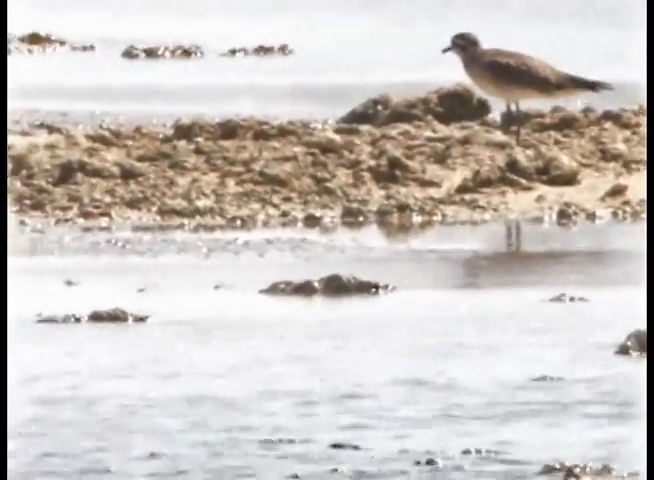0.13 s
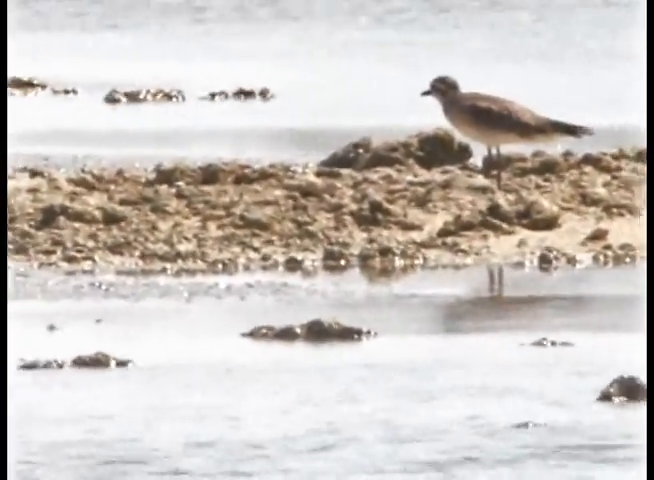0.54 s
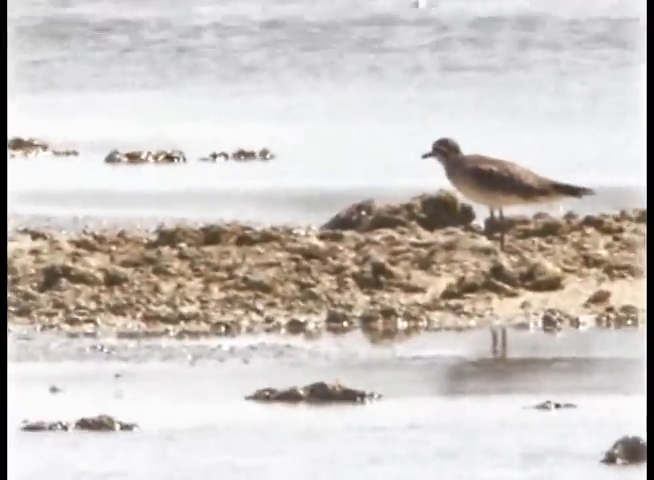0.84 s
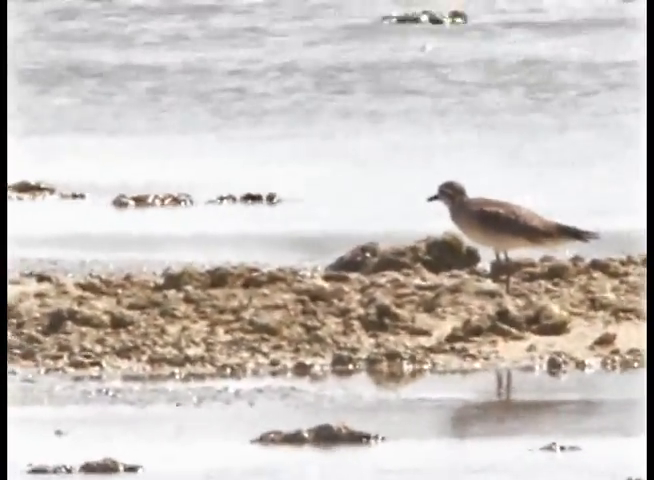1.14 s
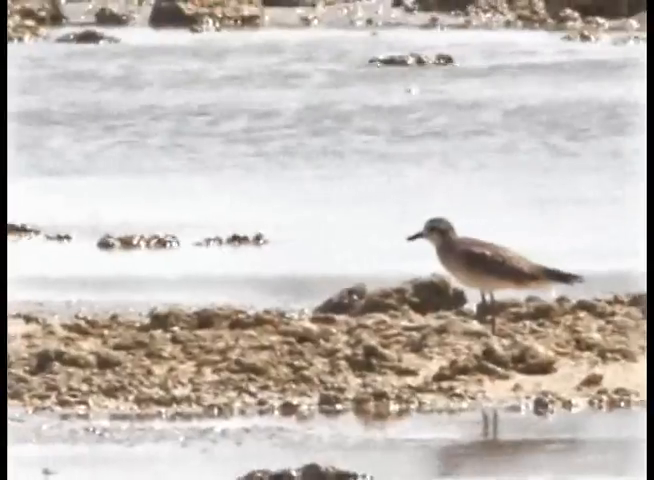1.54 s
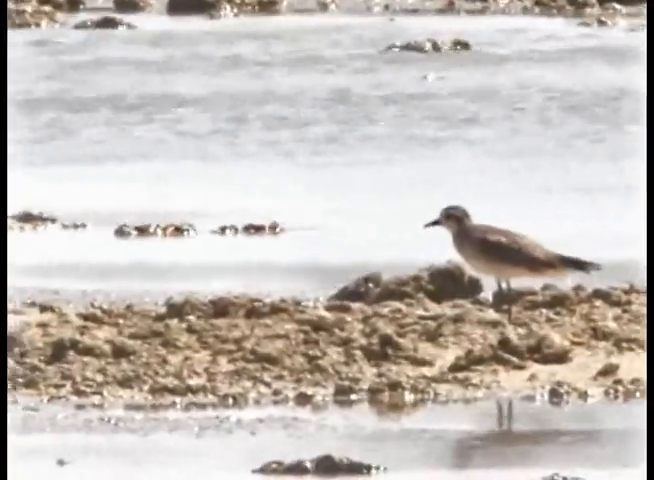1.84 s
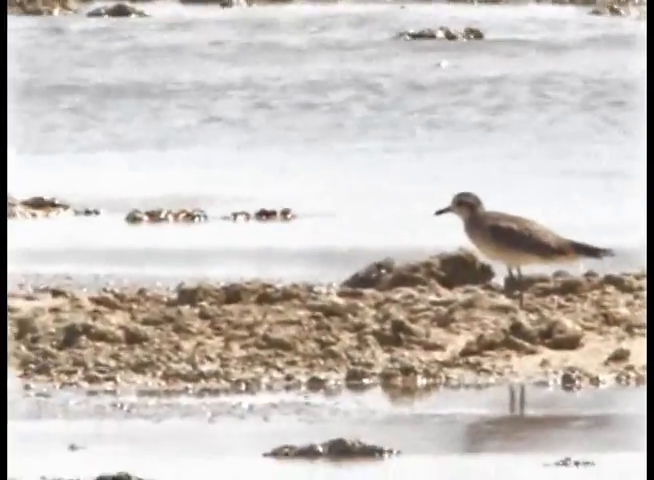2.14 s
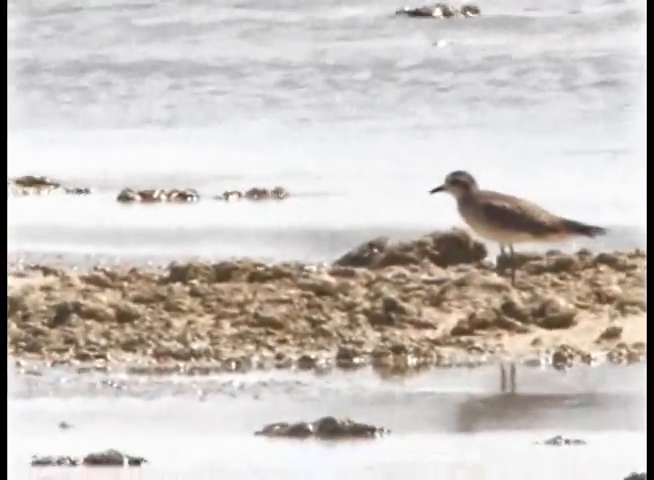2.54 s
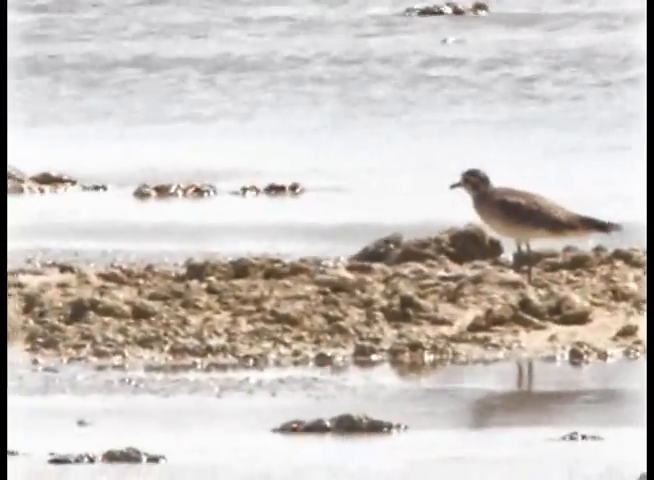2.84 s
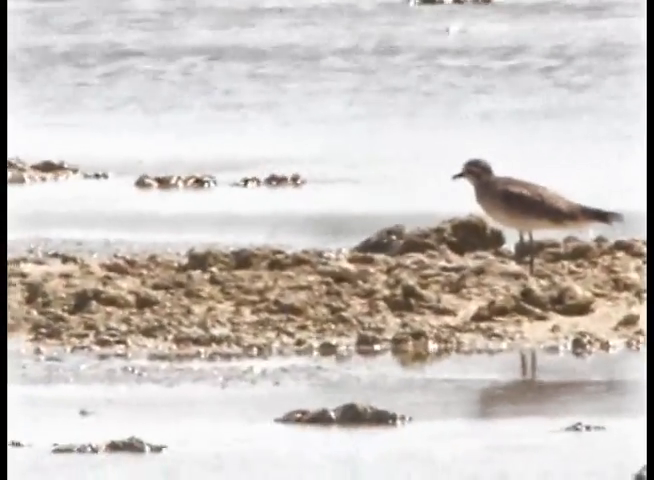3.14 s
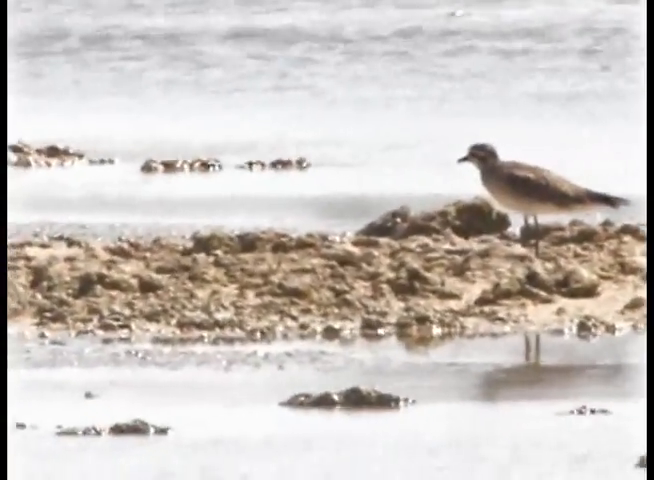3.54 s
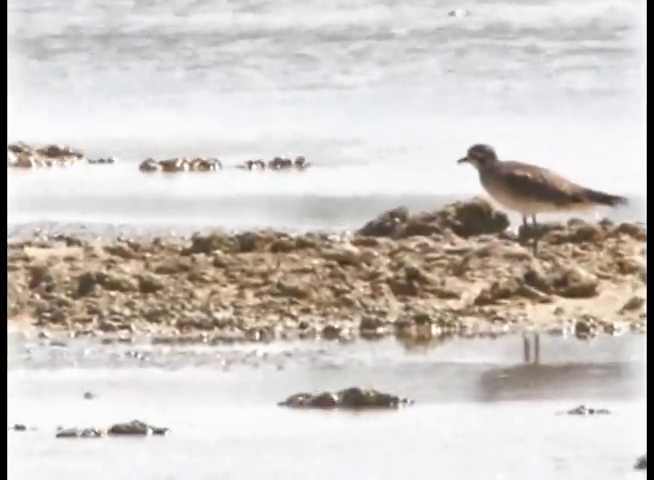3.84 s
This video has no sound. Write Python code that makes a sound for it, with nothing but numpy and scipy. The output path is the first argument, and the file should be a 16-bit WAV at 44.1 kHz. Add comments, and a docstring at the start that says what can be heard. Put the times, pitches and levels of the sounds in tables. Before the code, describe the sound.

Wind buffets the microphone in short, low thumps that grow louder and denser toward the end. Behind it, a distant bird repeats a brief raspy call over the steady hiss of an open tidal flat, with faint camera ticking.

```python
"""An open tidal flat, heard from a small camera. Short gusts buffet its microphone: each eddy is a low
thump, and the hardest clusters overload it. A far bird repeats an arched, throbbing call, with one
falling whistle and faint chirps around it. The camera adds its own whirr and ticking, and under
everything lies a steady noise wash of air and water."""
import sys
import numpy as np
from scipy import signal
from scipy.fft import rfft, irfft
from scipy.io import wavfile
from scipy.ndimage import uniform_filter1d

SR = 44100
rng = np.random.default_rng(int(sys.argv[2]) if len(sys.argv) > 2 else 0)


def persist_wave(psi):
    """Save psi, clipped to +-1, as 16-bit WAV."""
    counts = np.round(np.clip(psi, -1, 1) * 32767).astype(np.int16)
    wavfile.write(sys.argv[1], SR, np.atleast_2d(counts).T)


N = 176400


def amp(db):
    """Decibels to gain."""
    return 10 ** (np.asarray(db) / 20)


def rms_one(x):
    """Scale to unit rms."""
    return x / np.sqrt(np.mean(x ** 2) + 1e-20)


def drift(rate_hz, size=N):
    """Random modulator gliding between values of unit spread."""
    knots = rng.standard_normal(int(N / SR * rate_hz) + 2)
    return np.interp(np.arange(size) / SR * rate_hz, np.arange(len(knots)), knots)


def tone(hz):
    """Sine of unit rms along a pitch curve."""
    return np.sqrt(2) * np.sin(2 * np.pi * np.cumsum(hz) / SR)


def resonate(x, hz, width_hz):
    """Two-pole resonator with unity gain at its peak."""
    r = np.exp(-np.pi * width_hz / SR)
    gain = (1 - r * r) / 2
    return signal.lfilter([gain, 0, -gain], [1, -2 * r * np.cos(2 * np.pi * hz / SR), r * r], x)


def narrow_noise(bands):
    """Narrow bands of noise, each sent twice through its resonator."""
    return sum(amp(db) * rms_one(resonate(resonate(rng.standard_normal(N), hz, width), hz, width))
               for hz, width, db in bands)


def bursts(events, t60_s):
    """Noise bursts with a fast attack and a dying tail."""
    kicks, r = np.full(N, 1e-18), amp(-60 / (t60_s * SR))
    for s, db in events:
        kicks[int(s * SR)] = amp(db)
    envelope = signal.lfilter([np.e * (1 - r)], [1, -2 * r, r * r], kicks)
    return envelope * rng.choice([-1, 1], N)


def add(out, s, sound):
    """Mix a sound in at s seconds."""
    i = int(s * SR)
    out[i:i + len(sound)] += sound[:N - i]


def wind_buffets():
    """Each eddy striking the microphone makes a short thump of low noise."""
    # eddies: (time [s], length [s], level [dB], centre [Hz])
    eddies = [(0.667, 0.029, -47, 122), (1.474, 0.014, -31.5, 170.0), (1.485, 0.01, -19.5, 187),
              (1.498, 0.0073, -14.5, 255), (1.509, 0.0081, -19, 278), (1.523, 0.018, -34, 242),
              (1.568, 0.0068, -24, 219), (1.71, 0.031, -43, 159), (1.848, 0.02, -37.5, 147),
              (1.876, 0.052, -39, 154), (1.93, 0.017, -37, 167), (1.982, 0.028, -33.5, 140.0),
              (2.006, 0.016, -18.5, 179), (2.029, 0.021, -33, 201), (2.049, 0.071, -40, 129),
              (2.677, 0.0066, -15, 195), (2.703, 0.022, -22.5, 160), (2.747, 0.036, -39, 145),
              (2.819, 0.0095, -36, 173), (2.984, 0.018, -33.0, 124), (3.006, 0.018, -25.5, 250),
              (3.034, 0.011, -13, 270), (3.054, 0.017, -23, 190), (3.126, 0.021, -21, 183),
              (3.149, 0.012, -5.5, 286), (3.172, 0.023, -9, 328), (3.207, 0.079, -36, 210.0),
              (3.236, 0.0069, -14.5, 250), (3.258, 0.019, -18, 236), (3.279, 0.0082, -7.5, 332),
              (3.298, 0.012, -15, 251), (3.372, 0.031, -29.5, 228), (3.441, 0.023, -25.5, 168),
              (3.465, 0.0098, -21, 200.0), (3.479, 0.022, -18.5, 233), (3.518, 0.029, -17, 273),
              (3.54, 0.02, -21.5, 265), (3.571, 0.066, -27.5, 200), (3.626, 0.067, -28.5, 137),
              (3.639, 0.0071, -22.0, 208), (3.669, 0.026, -24.5, 153), (3.688, 0.022, -28, 260),
              (3.716, 0.079, -33.5, 157), (3.907, 0.023, -36, 162)]
    out, size = np.zeros(N), 8192
    f = np.arange(size // 2 + 1) * SR / size
    t = (np.arange(size) - size // 2) / SR
    for s, length, db, hz in eddies:
        ratio = f / (1.05 * hz)
        band = ratio ** 1.45 / np.sqrt(1 + ratio ** 8.888)   # rises 9, then falls 18 dB per octave
        envelope = .5 ** (np.abs(2 * t / length) ** 2.4)   # blunt-topped bell
        thump = envelope * irfft(rfft(rng.standard_normal(size)) * band)
        thump *= np.sqrt(np.sum(envelope ** 2) / np.sum(thump ** 2))
        add(out, s - size / 2 / SR, amp(db) * thump)
    return out


def bird_calls():
    """A far bird's raspy call arches in pitch, its throb deepening as it goes."""
    # calls: (start [s], level [dB])
    calls = [(0.139, -39), (0.828, -42.5), (2.113, -41.5), (2.729, -46), (3.42, -54.5)]
    # partials of the voice: (pitch multiple, offset [Hz], relative level [dB])
    partials = [(1, -4.5, -2.5), (.5, 1409, -12.5), (1.5, -6, -16), (2, 1.5, -17.5)]
    length_s, attack_s, release_s = .12, .045, .012
    top_hz, top_at_s, sag_hz = 2094, .075, 545.4
    throb_hz, crest_s = 44, .067
    out, size = np.zeros(N), int(length_s * SR)
    t = np.arange(size) / SR
    envelope = np.clip(np.minimum(t / attack_s, (length_s - t) / release_s), 0, 1)
    depth = np.clip(1.3 * t / crest_s, 0, 1) ** 2
    throb = 1 - depth * np.sin(np.pi * throb_hz * (t - crest_s)) ** 4
    arch_hz = top_hz - sag_hz * (t / top_at_s - 1) ** 2
    for s, db in calls:
        hz = arch_hz * (1 + .022 * drift(58.7, size))
        dulling_db = 1.2 * (db - calls[0][1])   # calls fainter than the first are also duller
        voice = np.zeros(size)
        for multiple, offset_hz, partial_db in partials:
            rasp_db = 3 * drift(127, size)
            gain = amp(partial_db + dulling_db * (multiple != 1) + rasp_db)
            voice += gain * tone(multiple * hz + offset_hz)
        hoarseness = 1 + .5 * drift(500, size)
        add(out, s, amp(db) * envelope * throb * voice * hoarseness)
    return out


def whistle():
    """One wavering whistle that drops fast, then sags slowly, with a faint octave on top."""
    # loudness envelope: (time [s], level [dB])
    contour = [(0, -48), (.033, -51), (.045, -57), (.1, -60), (.39, -61.5), (.43, -90)]
    base_hz, drop_hz, glide_s, sag_hz_per_s = 3390, 510, .045, 470
    t = np.arange(N) / SR
    hz = base_hz + drop_hz * np.exp(-t / glide_s) - sag_hz_per_s * t
    level_db = np.interp(t, *np.transpose(contour)) + 3 * drift(70)
    return amp(level_db) * (tone(hz) + amp(-25) * tone(2 * hz))


def far_chirps():
    """Short falling chirps, smeared by distance into noise bands, amid fainter random twitter."""
    # chirps: (start [s], centre [Hz], spread [Hz], level [dB])
    chirps = [(.755, 4180, 495, -58.5), (0.819, 4300, 700, -60), (1.195, 4350, 400, -65.5),
              (1.64, 3980, 1110, -63), (1.745, 3200, 250, -62), (2.321, 5040, 1810, -56.5),
              (2.92, 4400, 1210, -58), (2.97, 3860, 1390, -61), (3.089, 4540, 1303, -56.5),
              (3.37, 5050, 202, -61.5), (3.41, 4950, 200, -65), (3.581, 3060, 304, -60),
              (3.72, 4200, 202, -63)]
    length_s, twitter_count, low_hz, high_hz, twitter_spread_hz = .07, 60, 2300, 4700, 500
    twitter = [(when * N / SR, low_hz + (high_hz - low_hz) * pitch, twitter_spread_hz, -66 - 6 * faint)
               for when, pitch, faint in rng.random((twitter_count, 3))]
    out, size = np.zeros(N), int(length_s * SR)
    samples = np.arange(size)
    for s, hz, spread_hz, db in twitter + chirps:
        smear = rms_one(np.interp(samples / SR * spread_hz, samples, rng.standard_normal(size)))
        sweep = tone(hz + .35 * spread_hz * np.linspace(1, -1, size))
        add(out, s, amp(db) * np.hanning(size) * smear * sweep)
    return out


def camera():
    """The mechanism whirrs and its ticks ring the camera body; a bright crackle sounds close by."""
    # whirr bands: (centre [Hz], width [Hz], level [dB])
    whirr_bands = [(3490, 195, -69.5), (9760, 210, -83)]
    # ticks of the mechanism: (time [s])
    tick_times = [0.026, .137, .349, 0.635, 0.669, .772, 0.964, 1.058, 1.13, 1.274, 1.311, 1.536, 1.642,
                  1.698, 1.801, 1.849, 1.924, 1.963, 2.037, 2.103, 2.157, 2.188, 2.253, 2.29, 2.359, 2.396,
                  2.542, 2.562, 2.606, 2.713, 2.763, 2.791, 2.813, 3.307, 3.401, 3.433, 3.519, 3.704, 3.734,
                  3.775, 3.82, 3.879]
    # body resonances: (centre [Hz], width [Hz], gain [dB])
    body_modes = [(1980, 1030, 3), (3600, 240, 7.5), (4350, 860, -3.5), (7700, 900, -9.5)]
    # snaps of the crackle: (time [s], peak before the high-pass [dB])
    snaps = [(1.535, -43), (1.544, -44.5), (1.587, -62)]
    ticks = bursts([(s, -45) for s in tick_times], t60_s=.017)
    body = sum((-1) ** k * amp(db) * resonate(ticks, hz, width)
               for k, (hz, width, db) in enumerate(body_modes))
    high_pass = signal.butter(4, 8300, "high", fs=SR, output="sos")
    crackle = signal.sosfilt(high_pass, bursts(snaps, t60_s=.013))
    whirr = amp(3 * drift(7.6)) * narrow_noise(whirr_bands)
    return whirr + body + crackle


def air_and_water():
    """A bed of coloured noise, each octave wavering gently, with a few resonances in it."""
    # tone curve of the wash: (frequency [Hz], relative density [dB])
    tone_curve = [(15, -56), (25, -16.5), (102, -2.5), (205, -7), (371, -3), (1060, -14.5), (1470, -13),
                  (2030, -18.5), (3480, -22.5), (15800, -40)]
    # resonances in the wash: (centre [Hz], width [Hz], level [dB])
    peaks = [(392, 33, -66), (926, 207, -64), (1458, 147, -61), (1694, 154, -64)]
    bed_db, waver_db = -52, 1.5
    f = np.maximum(np.arange(N // 2 + 1) * SR / N, 1)
    hz, db = np.transpose(tone_curve)
    spectrum = rfft(rng.standard_normal(N)) * amp(np.interp(np.log(f), np.log(hz), db, left=-80))
    bed = np.zeros(N)
    for octave in range(11):
        band = np.clip(1 - np.abs(np.log2(f / 20) - octave), 0, 1)
        depth_db = waver_db * (.3 if octave > 6 else 1)   # the treble holds steadier
        bed += irfft(spectrum * band, N) * amp(depth_db * drift(4 + 3 * octave))
    return amp(bed_db) * rms_one(bed) + narrow_noise(peaks) * amp(waver_db * drift(6.05))


def high_hiss():
    """Brief stretches of faint, smooth hiss."""
    # stretches: (start [s], length [s], level [dB])
    stretches = [(0.579, .28, -72.5), (2.953, .2, -67.5)]
    out = np.zeros(N)
    band = signal.butter(2, [6000, 12400], "band", fs=SR, output="sos")
    hiss = rms_one(signal.sosfilt(band, rng.standard_normal(N)))
    for s, length, db in stretches:
        add(out, s, amp(db) * hiss[:int(length * SR)])
    return out


def scene():
    """Mono mix of all the layers."""
    mix = wind_buffets() + air_and_water() + camera()
    return (mix + bird_calls() + whistle() + far_chirps() + high_hiss())[None]


def record(dry):
    """The microphone sheds deep bass, gain control ducks on loud gusts, peaks clip, the top is cut."""
    low_cut_hz, high_cut_hz = 47, 15960
    threshold_db, duck_share, attack_s, release_db_per_s = -16, .45, .008, 7.2
    ceiling, hardness = .386, 12
    x = signal.sosfilt(signal.butter(2, low_cut_hz, "high", fs=SR, output="sos"), dry)
    level_db = 10 * np.log10(uniform_filter1d(x ** 2, size=441) + 1e-12)
    duck_db = duck_share * np.maximum(level_db - threshold_db, 0)
    release_ramp = release_db_per_s * np.arange(N) / SR
    held_db = np.maximum.accumulate(duck_db + release_ramp, axis=1) - release_ramp
    r = np.exp(-1 / (attack_s * SR))
    ducked = x * amp(-signal.lfilter([1 - r], [1, -r], held_db))
    clipped = ducked / (4 + np.abs(ducked / ceiling) ** hardness) ** (1 / hardness)
    return signal.sosfilt(signal.cheby2(24, 50, high_cut_hz, fs=SR, output="sos"), clipped)


dry = scene()
out = record(dry)
persist_wave(out)
```